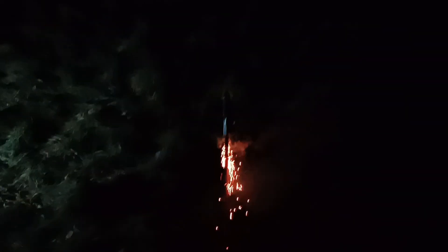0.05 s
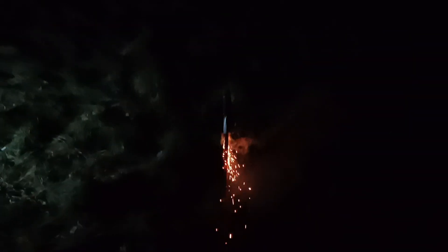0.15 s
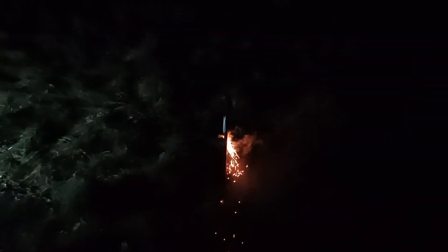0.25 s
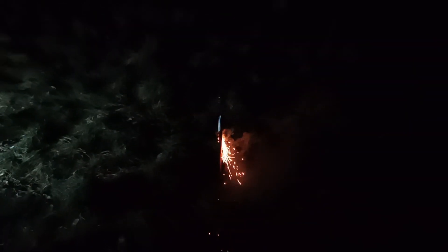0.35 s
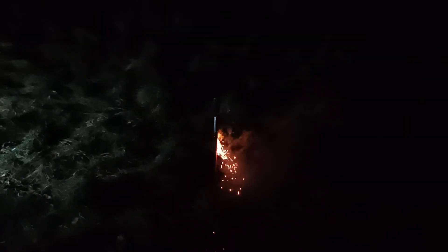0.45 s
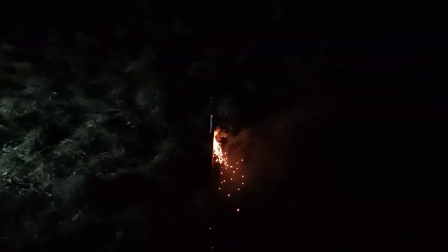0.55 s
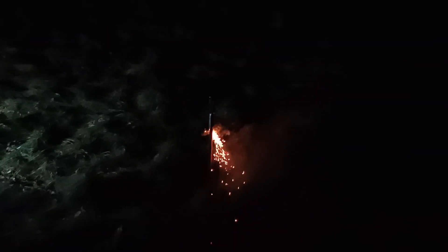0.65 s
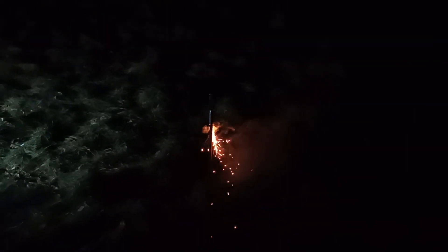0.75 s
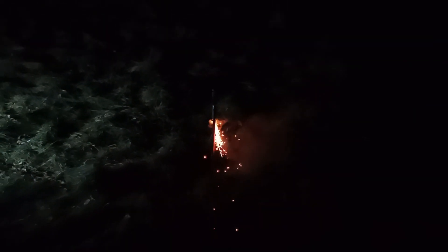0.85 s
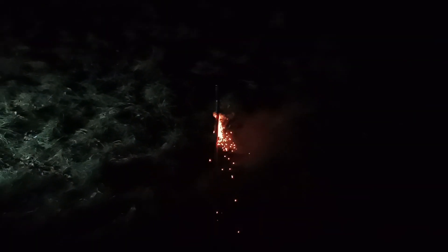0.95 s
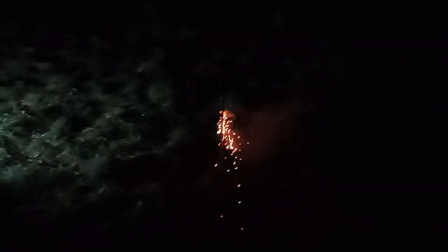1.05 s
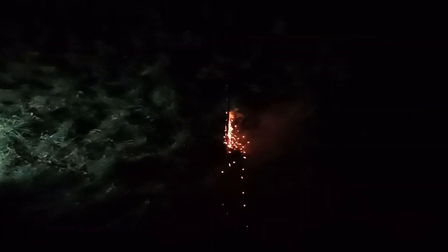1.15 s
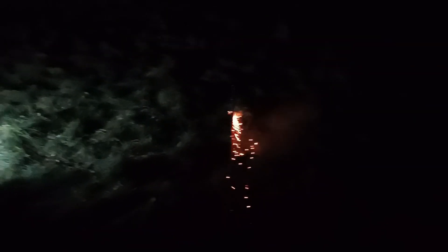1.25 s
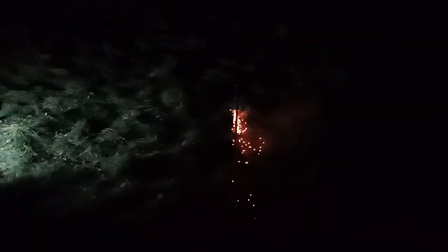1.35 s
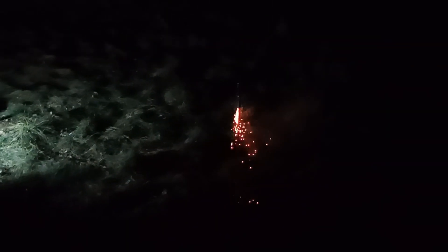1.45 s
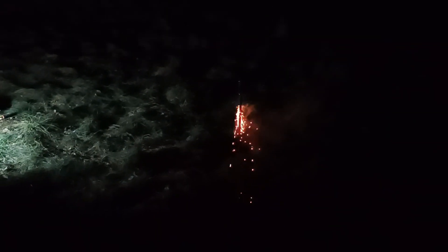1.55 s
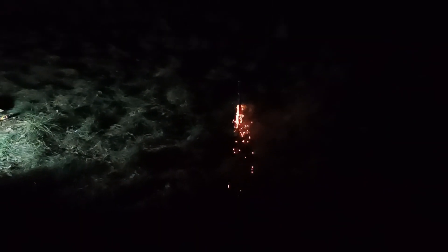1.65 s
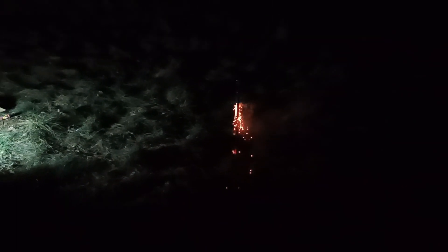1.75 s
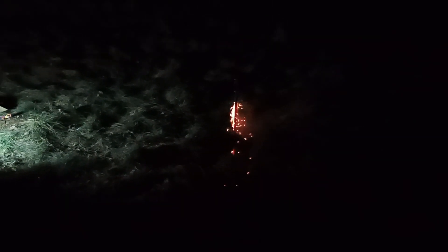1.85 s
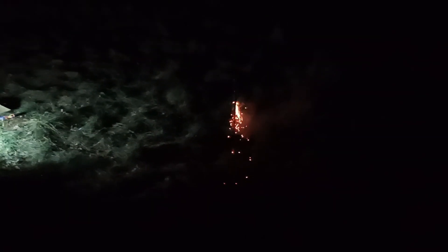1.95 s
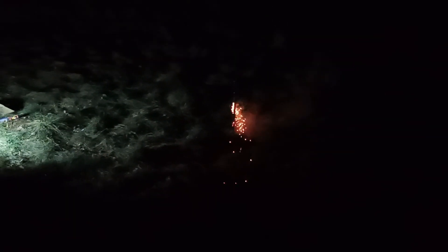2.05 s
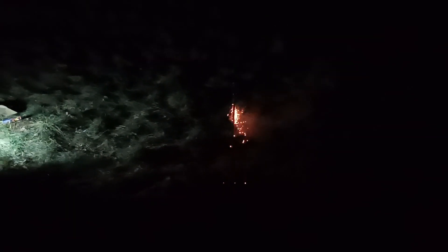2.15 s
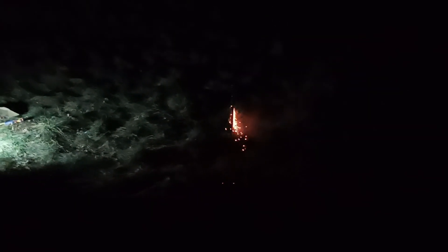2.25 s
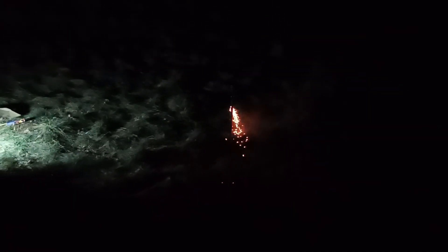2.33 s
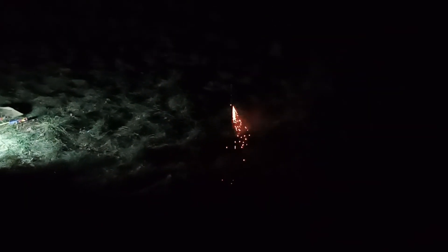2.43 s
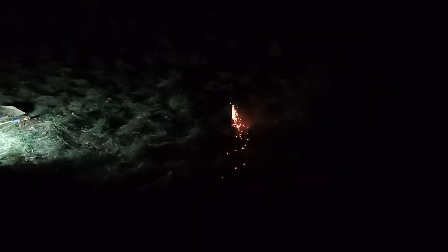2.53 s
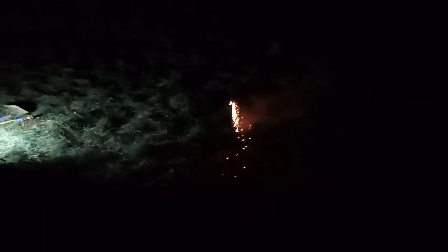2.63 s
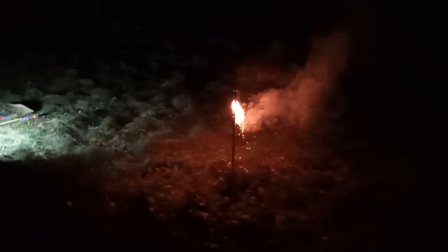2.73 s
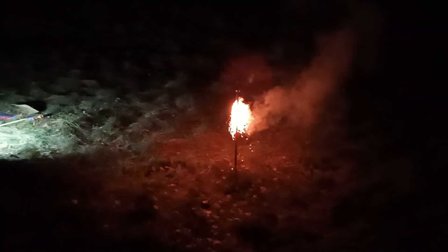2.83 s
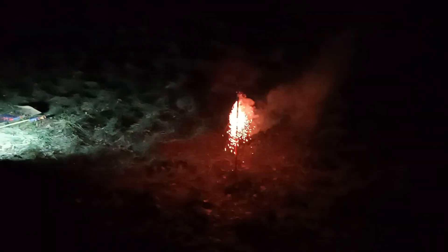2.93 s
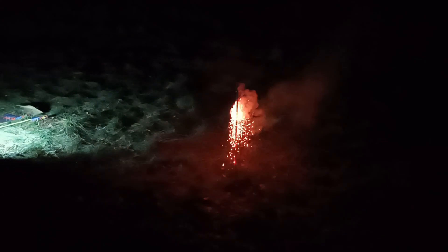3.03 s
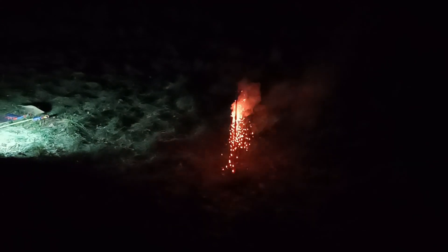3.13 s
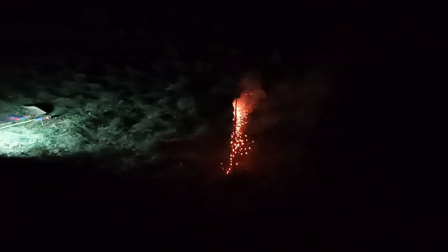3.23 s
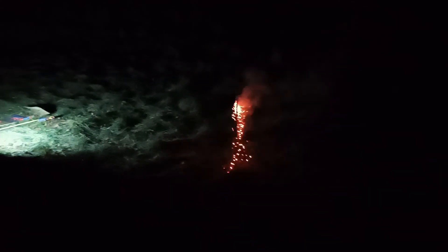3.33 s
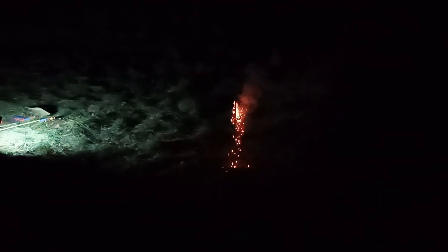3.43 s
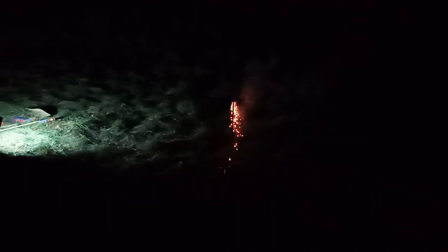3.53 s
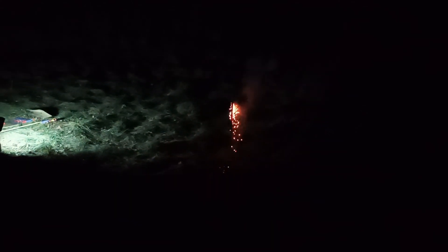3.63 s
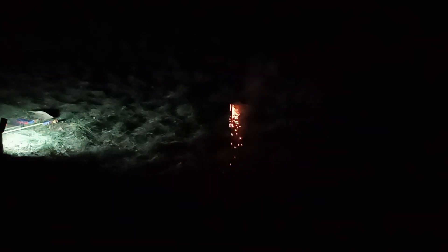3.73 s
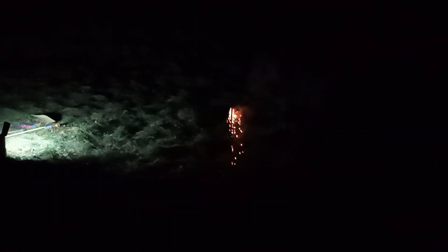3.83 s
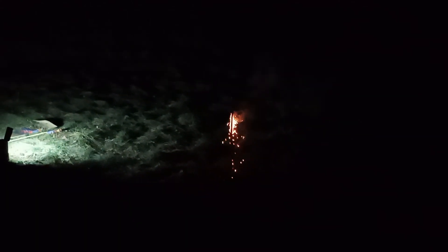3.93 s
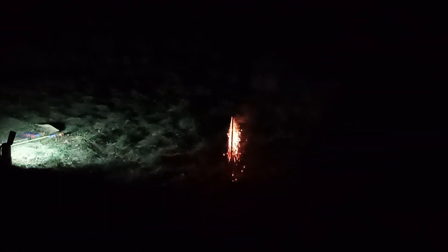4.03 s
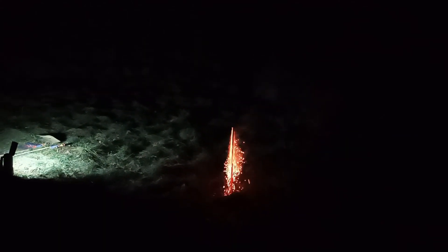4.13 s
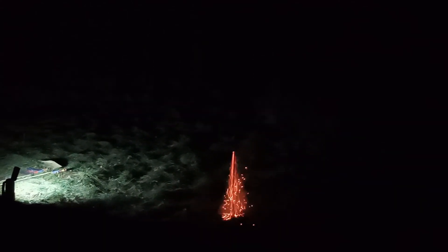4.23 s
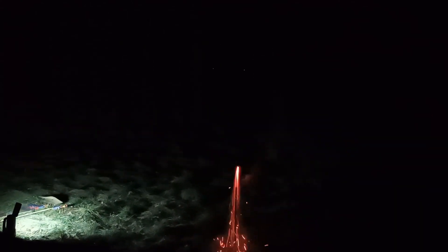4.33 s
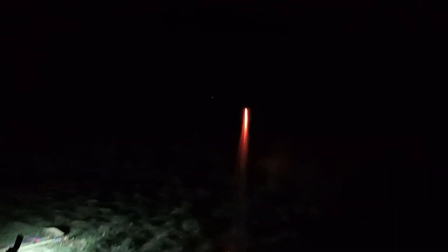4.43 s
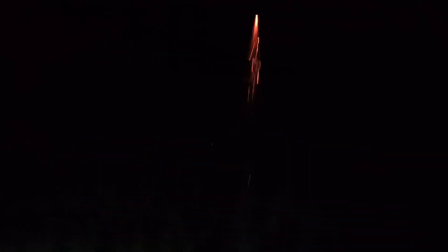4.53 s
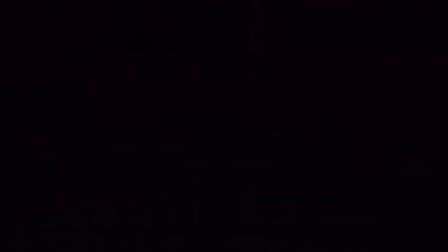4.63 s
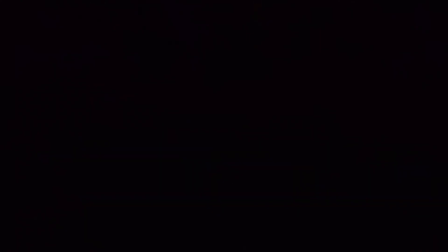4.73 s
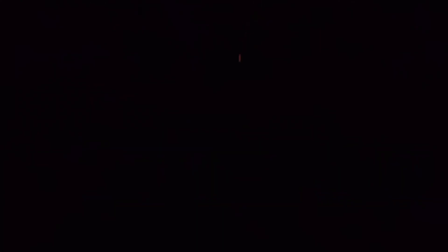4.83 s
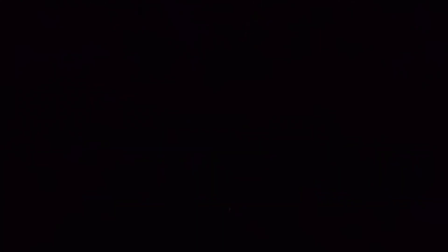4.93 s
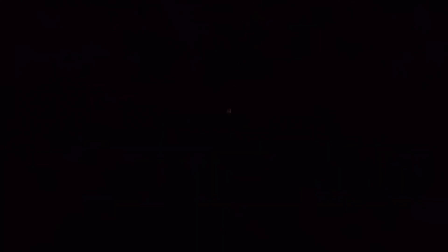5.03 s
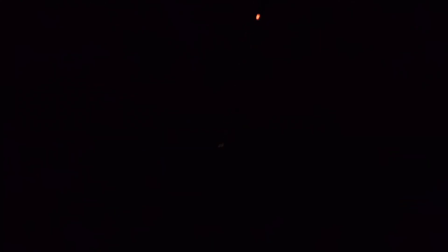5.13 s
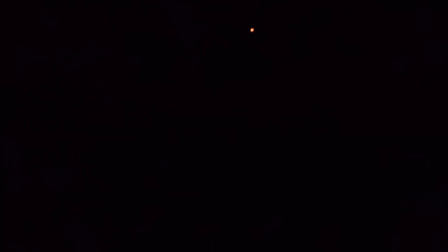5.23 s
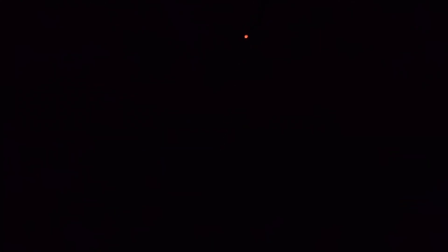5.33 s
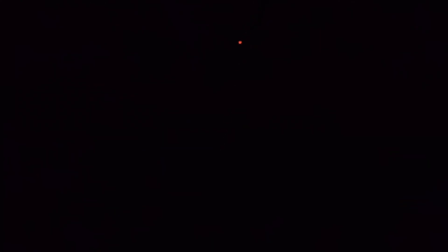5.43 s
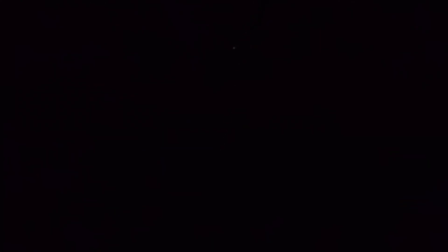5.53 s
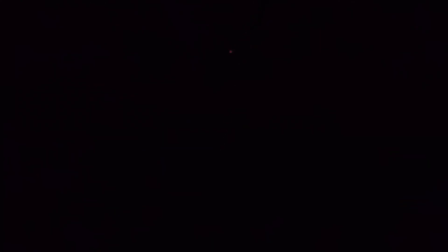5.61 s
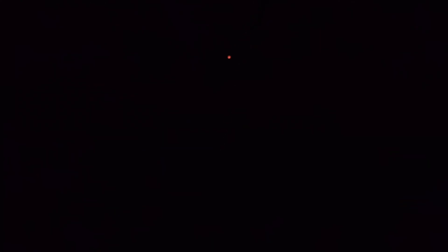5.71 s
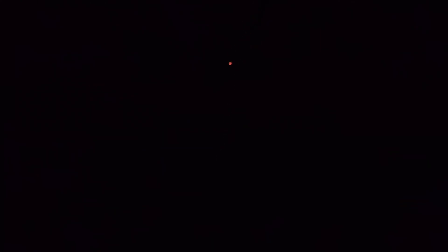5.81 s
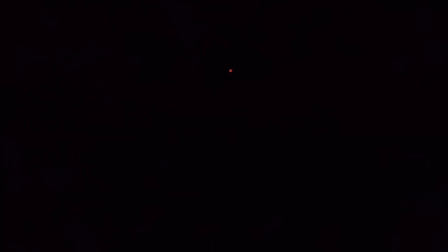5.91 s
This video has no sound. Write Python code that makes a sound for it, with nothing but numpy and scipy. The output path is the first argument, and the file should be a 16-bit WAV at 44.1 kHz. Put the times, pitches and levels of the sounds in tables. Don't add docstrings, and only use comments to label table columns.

```python
import sys
import numpy as np
from scipy import signal
from scipy.fft import rfft, irfft, next_fast_len
from scipy.io import wavfile
from scipy.ndimage import map_coordinates

SR = 44100
rng = np.random.default_rng(int(sys.argv[2]) if len(sys.argv) > 2 else 0)


def volts(x):
    e = np.asarray(x, float) / 20
    return 10 ** e


def pcm_store(signal):
    levels = np.round(np.clip(np.atleast_2d(signal), -1, 1) * 32767)
    wavfile.write(sys.argv[1], SR, levels.astype(np.int16).T)


N = 263277


def in_time(rows, t):
    s, *columns = np.transpose(rows)
    return [np.interp(t, s, c) for c in columns]


def at_hz(points, hz):
    point_hz, value = np.transpose(points)
    return np.interp(np.log(hz), np.log(point_hz), value)


def drift(rate_hz, size):
    knots = rng.standard_normal(int(size / SR * 60) + 62)
    r = np.exp(-2 * np.pi * rate_hz / 60)
    slow = signal.lfilter([np.sqrt(1 - r * r)], [1, -r], knots)[60:]
    return np.interp(np.linspace(0, len(slow) - 1, size), np.arange(len(slow)), slow)


def delayed(x, ms):
    return map_coordinates(x, [np.arange(len(x)) - ms / 1000 * SR], order=3)


def bursts(events, t, floor_db, rise_db_per_s, fall_db_per_s):
    s, hold_s, db = np.transpose(events)[:, :, None]
    rising = rise_db_per_s * np.maximum(s - t, 0)
    falling = fall_db_per_s * np.maximum(t - s - hold_s, 0)
    return np.maximum((db - rising - falling).max(0), floor_db)


def by_effort(rows, full_db, tilt_db, focus_db, tilt_per_db=0, focus_per_db=0, tilt_per_s=0, focus_per_s=0):
    s, db = np.transpose(rows)
    short_db, age_s = np.maximum(full_db - db, 0), s - s[0]
    tilt = tilt_db + tilt_per_db * short_db + tilt_per_s * age_s
    focus = focus_db + focus_per_db * short_db + focus_per_s * age_s
    return np.c_[s, db, tilt, focus]


# frequency in Hz, left-right likeness 0-1.
LIKENESS = [(100, 1), (250, 0.89), (700, 0.86), (1500, 0.68), (3000, 0.58), (5500, 0.51), (11000, 0.26)]
# frequency in Hz, lead of the left port in radians.
LEFT_LEAD = [(100, .01), (750, 0.29), (1500, 0.66), (3000, 0.4), (5500, 0.88), (11000, 1.1)]
# frequency in Hz, left over right in dB.
LEFT_GAIN = [(60, 1), (150, 1.5), (380, 0.5), (950, 0.0), (2380, 1.5), (5980, 1), (15000, -5.5)]


def hiss(rows, colour, centre_hz, patchy_db, crackle_db, direct, pan_db, step_oct=0.506, skirt=0):
    first, last = round(rows[0][0] * SR), min(round(rows[-1][0] * SR), N)
    size = next_fast_len(last - first)
    level_db, tilt_db, focus_db = in_time(rows, (first + np.arange(size)) / SR)
    white = rng.standard_normal((2, size)) * volts(crackle_db * rng.standard_normal((2, size)))
    hz = np.maximum(np.fft.rfftfreq(size, 1 / SR), 1)
    same, other = rfft(white) * volts(at_hz(colour, hz))

    alike = np.clip(direct * at_hz(LIKENESS, hz), 0, 1)
    lean = volts(.5 * (at_hz(LEFT_GAIN, hz) * direct + pan_db))
    shared = alike * same * np.exp(-1j * at_hz(LEFT_LEAD, hz))
    right = (shared + np.sqrt(1 - alike ** 2) * other) / lean
    lowest_hz = colour[0][0]
    pair = np.array([same * lean, right]) * (hz > lowest_hz)
    pair /= np.sqrt(np.mean(irfft(pair.mean(0), size) ** 2))

    out, together = np.zeros((2, N)), drift(9.0, size)
    for band_hz in lowest_hz * 2 ** np.arange(0, np.log2(17000 / lowest_hz) + step_oct, step_oct):
        off_band = np.log2(hz / band_hz) / step_oct / 2
        share = np.cos(np.pi * np.clip(off_band, -.5, .5)) ** 2
        octave = np.log2(band_hz / centre_hz)
        gain_db = level_db + tilt_db * octave - focus_db * octave ** 2
        gain_db = gain_db + patchy_db * (together + drift(35.0, size))
        aside = np.clip(octave - tilt_db / 2 / np.maximum(focus_db, 1), -1, 1)
        gain_db = gain_db - skirt * np.maximum(focus_db, 0) * aside ** 4
        out[:, first:last] += (irfft(pair * share, size) * volts(gain_db))[:, :last - first]
    return out


# time in seconds, distance in m that sets the delay, share the grass reflects 0-1.
LISTENER = [(0, 4.8, .4), (.45, 4.98, .4), (1.0, 5.07, .45), (1.1, 2.86, .8), (1.43, 2.94, .7),
            (1.7, 3.02, .4), (2.03, 3.17, .35), (2.28, 3.24, .7), (2.48, 3.31, .85), (2.68, 3.44, .45),
            (3.02, 3.62, .4), (3.14, 3.66, .8), (3.3, 3.68, .98), (3.55, 3.78, .95), (3.62, 3.75, .8),
            (3.88, 3.84, .9), (4.18, 3.95, .75)]


def ground(x):
    fire_height_m, ear_height_m, out_of_mirror_m, sound_m_per_ms = .6, 1.4, 3.4, .343
    ignition_s, plume_scatter_per_s, plume_clear_below_hz = 4.06, 5.5, 1700
    lift_off_s, climb_m_per_s2 = 4.3, 22
    second_bounce = .36
    t = np.arange(x.shape[1]) / SR
    distance_m, grass = in_time(LISTENER, t)
    height_m = fire_height_m + .5 * climb_m_per_s2 * np.maximum(t - lift_off_s, 0) ** 2
    height_m = np.minimum(height_m, out_of_mirror_m)
    clear = grass * np.clip((lift_off_s + 0.077 - t) / .05, 0, 1)
    share = grass / (1 + plume_scatter_per_s * np.maximum(t - ignition_s, 0))
    path_ms = 2 * height_m * ear_height_m / distance_m / sound_m_per_ms
    path_ms = path_ms + .008 * drift(5.0, N)[:len(t)]
    dull = signal.sosfiltfilt(signal.butter(1, 16000, fs=SR, output="sos"), x)
    once = np.array([delayed(side, path_ms) for side in dull])
    twice = np.array([delayed(side, 2 * path_ms) for side in dull])
    lows = signal.sosfiltfilt(signal.butter(2, plume_clear_below_hz, fs=SR, output="sos"), once)
    mirrored = share * (once + second_bounce * twice) + np.maximum(clear - share, 0) * lows
    return (x + mirrored) / np.sqrt(1 + share ** 2)


# time in seconds, delay in ms, share.
TILT = [(4.66, 0.26, 0.12), (5.1, .18, 0.21), (5.33, 0.18, .3), (5.5, 0.21, 0.15), (5.72, 0.12, 0.21),
        (5.97, 0.16, 0.17)]


def palm(x):
    first = round(TILT[0][0] * SR)
    ms, share = in_time(TILT, np.arange(first, N) / SR)
    dull = signal.sosfiltfilt(signal.butter(2, 8000, fs=SR, output="sos"), x[:, first:])
    return x + np.pad([share * delayed(side, ms) for side in dull], [(0, 0), (first, 0)])


# time in seconds, added lead of the left port in microseconds.
TURN = [(0, -10), (1.5, -1), (2.3, 18), (3.3, -11), (3.8, -26), (4.2, -31), (4.38, -20), (4.6, 7),
        (5.0, -5), (5.6, 6), (5.97, 20)]


def turned(air):
    lead_us, = in_time(TURN, np.arange(N) / SR)
    return np.array([air[0], delayed(air[1], lead_us / 1000)])


# delay in ms, share at left port, share at right port.
CASE_ECHOES = [(.36, -0.019, 0.056), (.57, 0.034, 0.039), (.68, -0.059, -0.018), (.82, 0.0066, 0.063)]
# frequency in Hz, width in Hz, gain in dB.
PORT_MODES = [(1390, 180, 1), (2540, 88, 1.5), (3340, 260, -1.5), (4630, 250, 0), (4030, 700, 1),
              (5180, 1000, -1.5), (5930, 170, 1), (6350, 280, -0.5), (7320, 270, 2.5), (9170, 1500, 2)]


def ports(air):
    step_hz, step_db = 7850, -6.5
    hz = np.fft.rfftfreq(N, 1 / SR)
    echoes = 1
    for ms, left, right in CASE_ECHOES:
        echoes = echoes + np.array([[left], [right]]) * np.exp(-2j * np.pi * hz * ms / 1000)
    gain_db = step_db / (1 + np.exp((step_hz - hz) / 150))
    for mode_hz, width_hz, db in PORT_MODES:
        gain_db = gain_db + db / (1 + (2 * (hz - mode_hz) / width_hz) ** 2)
    return irfft(rfft(air) * echoes * volts(gain_db), N)


def self_noise():
    return volts(-71.5) * rng.standard_normal((2, N))


# time in seconds, level in dB.
NIGHT = [(0, -50), (.5, -51), (.75, -52.5), (1.15, -51), (1.6, -54.5), (2.05, -50), (2.55, -53.5),
         (2.72, -55), (2.85, -52), (3.0, -54.5), (3.3, -52.5), (3.9, -57.5), (4.2, -49), (4.75, -55),
         (5.1, -62), (5.97, -55)]
# frequency in Hz, level in dB per Hz.
NIGHT_COLOUR = [(88, -15), (150, -2), (350, -7), (570, -5), (1400, -8), (2800, -14), (5500, -22.5),
                (8500, -24.5), (16000, -49)]


def night():
    calm = by_effort(NIGHT, full_db=-48.5, tilt_db=0.5, focus_db=-0.36, tilt_per_db=-0.06, focus_per_db=0.07)
    return hiss(calm, NIGHT_COLOUR, centre_hz=1470, patchy_db=1.2, crackle_db=1.0, direct=0.99, pan_db=-.5)


# time in seconds, level in dB, left over right in dB.
WIND = [(0, -45.5, 3), (.32, -54, 6), (.5, -43, -18), (.73, -46, 4), (1.3, -48.5, 10), (1.6, -54.5, 5),
        (2.1, -52.5, 6), (2.4, -55, 5.5), (3.3, -52.5, -1.5), (4.35, -59.5, 0), (4.48, -42, 17),
        (4.58, -40, 8), (4.69, -68, 4), (4.95, -58.5, -4), (5.4, -55, 3), (5.97, -57, -5)]
# centre in seconds, peak in dB, frequency in Hz.
BUFFETS_LEFT = [(0.015, -30, 54.6), (0.248, -37, 37.6), (0.493, -26.5, 82.5), (0.546, -30, 65.6),
                (0.676, -16, 67.6), (0.728, -14.5, 60), (0.81, -20.5, 69.7), (0.892, -31, 52),
                (0.96, -20, 66), (1.032, -20.5, 47.7), (1.077, -25, 33.5), (1.14, -30.5, 48.7),
                (1.201, -20.5, 53), (1.28, -27.5, 37), (1.386, -23, 48.4), (1.464, -31.5, 40),
                (1.665, -44, 52), (1.802, -39, 48), (1.896, -28.5, 38.2), (1.983, -30.5, 76.4),
                (2.056, -25, 44), (2.522, -43, 53), (2.81, -47, 65), (3.278, -34.5, 51.4),
                (4.432, -41, 81.5), (4.476, -24, 63.3), (4.549, -23.5, 121), (4.607, -35, 76),
                (4.585, -22, 152), (4.632, -24.5, 172), (.655, -20, 45.7), (.76, -23.5, 58.5),
                (.925, -34, 60), (1.01, -24.5, 75.6), (1.33, -31, 50), (2.86, -43, 40), (2.96, -41, 43.2),
                (3.5, -52, 55), (5.08, -48, 45), (5.45, -44, 50)]
# centre in seconds, peak in dB, frequency in Hz.
BUFFETS_RIGHT = [(0.034, -25.5, 44.6), (0.1, -35.5, 42), (0.176, -36, 45.7), (0.26, -30.5, 54),
                 (0.471, -17, 49), (0.509, -21, 72.6), (0.551, -10.5, 46.2), (0.654, -17.5, 46.3),
                 (0.741, -24, 99), (0.865, -37, 43), (0.918, -29, 39.8), (0.963, -44, 72), (1.074, -35, 49),
                 (4.487, -29, 139), (4.55, -37, 87), (4.597, -21.5, 57.5), (4.519, -26.5, 171),
                 (4.574, -30, 130), (4.62, -20.5, 185), (.445, -22, 85.4), (.625, -26.5, 59.7),
                 (.785, -32, 45), (4.96, -37, 42), (5.01, -40, 40)]
CREST_SHARE = [.3, 0.25]


def wind():
    level_db, pan_db = in_time(WIND, np.arange(N) / SR)
    band = signal.butter(2, [11, 62], "band", fs=SR, output="sos")
    out = signal.sosfilt(band, rng.standard_normal((2, N + SR)))[:, SR:]
    out *= volts(level_db + 4.0 + .5 * pan_db * np.array([[1], [-1]])) / out.std()
    out *= volts(2.1 * np.array([drift(4.5, N), drift(3.0, N)]))
    near = np.arange(-4000, 4000)
    t = near / SR
    for side, buffets in enumerate((BUFFETS_LEFT, BUFFETS_RIGHT)):
        for (s, peak_db, hz), turn in zip(buffets, rng.random(len(buffets))):
            cycle = 2 * np.pi * (hz * t + turn)
            flap = np.sin(cycle) * np.exp(-(t * hz / 0.83) ** 2)
            flap += CREST_SHARE[side] * np.sin(2.18 * cycle) * np.exp(-(t * hz / 0.45) ** 2)
            at = round(s * SR) + near
            out[side, at[at >= 0]] += volts(peak_db) * flap[at >= 0]
    return out


# time in seconds, level in dB.
BLAST = [(4.44, -57), (4.475, -40), (4.53, -40.5), (4.6, -40), (4.635, -42), (4.65, -61)]
# frequency in Hz, level in dB per Hz.
BLAST_COLOUR = [(120, -4), (200, 1), (330, -6), (500, -6), (800, -25)]


def backwash():
    gust = by_effort(BLAST, full_db=-40, tilt_db=-0.5, focus_db=-0.5)
    return hiss(gust, BLAST_COLOUR, centre_hz=250, patchy_db=2.0, crackle_db=0.5, direct=0.1, pan_db=1.0)


# start in seconds, peak in dB, frequency in Hz, t60 in seconds, brightness in dB.
KNOCKS = [(0.364, -37, 764, 0.018, -10), (0.411, -30.5, 194, 0.052, -27), (1.596, -30, 278, 0.021, -33),
          (1.599, -33.5, 80, 0.041, -30), (1.75, -37.5, 235, 0.033, -9), (2.273, -27, 180, 0.095, -32),
          (2.315, -40, 400, 0.01, -2.5), (2.5614, -35.5, 298, 0.049, -6.5), (2.569, -33.5, 85, 0.14, -30),
          (2.6188, -30.5, 267, 0.031, -26), (2.622, -30, 85, 0.067, -30), (2.638, -33.5, 125, 0.067, -30),
          (2.652, -36, 70, 0.079, -27), (2.81, -39, 171, 0.052, -11), (2.851, -37.5, 105, 0.059, -25),
          (3.68, -39.5, 598, 0.085, -4.5), (3.699, -35.5, 324, 0.015, -13), (5.725, -24.5, 310, 0.023, -10),
          (5.7349, -23, 310, 0.016, -15.5), (3.689, -41, 202, 0.083, -26), (4.0, -41.5, 250, 0.032, -10)]


def knocks():
    out, t = np.zeros(N + 8000), np.arange(8000) / SR
    dull = signal.butter(2, [250, 1300], "band", fs=SR, output="sos")
    for s, peak_db, hz, t60_s, bright_db in KNOCKS:
        ring = -np.sin(2 * np.pi * hz * 0.0597 * np.log1p(t / 0.0608))
        mode = ring * volts(-60 * t / t60_s) * (1 - np.exp(-t / 0.00075))
        grit = rng.standard_normal(8000) * volts(-60 * t / 0.028)
        scuff = 5 * volts(bright_db) * signal.sosfilt(dull, grit)
        first = round(s * SR)
        out[first:first + 8000] += volts(peak_db) * (mode + scuff)
    return out[:N]


# start in seconds, length in seconds, from Hz, to Hz, level in dB.
SQUEAKS = [
    (1.848, .035, 14450, 14800, -55),
    (1.897, .018, 15100, 15550, -69),
]


def squeaks():
    t, out = np.arange(N) / SR, np.zeros(N)
    for s, length_s, from_hz, to_hz, db in SQUEAKS:
        done = np.clip((t - s) / length_s, 0, 1)
        cycles = np.cumsum(from_hz + (to_hz - from_hz) * done) / SR
        out += volts(db) * np.sin(np.pi * done) * np.sin(2 * np.pi * cycles)
    return out


# start in seconds, hold in seconds, level in dB.
RUSTLES = [(.55, .01, -65.5), (.62, 0.11, -67.5), (.85, 0.53, -66), (1.51, .01, -66.5),
           (1.65, 0.099, -71.5), (1.86, 0.15, -69), (2.05, 0.11, -64), (2.32, .01, -70),
           (2.44, 0.0092, -68), (2.5, .1, -70.5), (3.03, .01, -72), (3.16, .03, -65), (3.31, .01, -68),
           (3.46, .02, -66), (3.62, 0.34, -68.5), (4.05, .01, -82)]
# frequency in Hz, level in dB per Hz.
RUSTLE_COLOUR = [(3000, -9), (6000, -0.5), (9000, 1), (16000, -7)]


def rustle():
    t = np.linspace(.5, 4.05, 711)
    moves = np.c_[t, bursts(RUSTLES, t, floor_db=-93, rise_db_per_s=178, fall_db_per_s=248)]
    cloth = by_effort(moves, full_db=-66, tilt_db=-1.5, focus_db=-2.2, tilt_per_db=0.2, focus_per_db=0.25)
    return volts(6.0) * hiss(cloth, RUSTLE_COLOUR, centre_hz=9570, patchy_db=1.5, crackle_db=5.5,
                           direct=0.52, pan_db=5.0)


# time in seconds, level in dB.
SPARKS = [(0, -41.5), (.1, -42.5), (.23, -44), (.29, -55), (.4, -50.5), (.53, -49), (.6, -67), (.8, -94)]
# frequency in Hz, level in dB per Hz.
SPARKS_COLOUR = [(300, 0), (600, -1), (1050, 0), (2500, -3.5), (3300, -5.5), (5900, 0.5), (8500, -2.5),
                 (16000, -6)]


def sparks():
    spurt = by_effort(SPARKS, full_db=-40, tilt_db=-1.5, focus_db=1.0, tilt_per_db=-0.0841, focus_per_db=-0.1)
    return hiss(spurt, SPARKS_COLOUR, centre_hz=3000, patchy_db=1.8, crackle_db=0.0, direct=0.87, pan_db=0.5)


# time in seconds, level in dB.
TUBE = [(0, -48), (.055, -49.5), (.09, -58), (.18, -50), (.245, -43.5), (.3, -52), (.37, -59), (.6, -67)]
# frequency in Hz, level in dB per Hz.
TUBE_COLOUR = [(1000, -25), (1210, -12), (1290, 0), (1380, -11), (1620, -25), (1840, -15), (1920, -3),
               (2010, -15), (2280, -10), (2450, -17), (2900, -14), (3300, -30)]
# start in seconds, hold in seconds, gain in dB.
PUFFS = [
    (.052, .005, 8.5),
    (.108, .006, 10),
    (.183, .005, 3.5),
    (.218, .008, 3),
    (.245, 0.0072, 1),
]


def tube():
    t = np.linspace(0, .6, 301)
    puffs_db = bursts(PUFFS, t, floor_db=0, rise_db_per_s=1500, fall_db_per_s=700)
    puffing = np.c_[t, in_time(TUBE, t)[0] + puffs_db]
    song = by_effort(puffing, full_db=-47, tilt_db=-6.0, focus_db=6.0, tilt_per_db=-0.2, tilt_per_s=13.0)
    return hiss(song, TUBE_COLOUR, centre_hz=1545, patchy_db=1.0, crackle_db=-2.0, direct=1.0, pan_db=-5.5)


# start in seconds, hold in seconds, level in dB.
FLARES = [(0, .26, -48), (.32, .22, -54), (1.07, .03, -55), (1.13, .02, -50), (1.24, .2, -56.5),
          (1.5, .2, -53.5), (1.82, .08, -49), (1.92, .1, -43), (2.12, .28, -46.5), (2.44, .12, -39),
          (2.6, .04, -49), (2.79, 0.1, -56), (2.93, .05, -55), (3.035, .06, -48.5), (3.12, 0.075, -43.5),
          (3.24, 0.11, -45.5), (3.37, 0.095, -45), (3.52, 0.024, -46), (3.65, .03, -52), (3.72, 0.03, -47),
          (3.86, 0.08, -52), (4.03, .02, -55)]
# time in seconds, pitch in Hz, focus in dB per octave squared.
FUSE_JET = [(.2, 11900, 0), (.55, 7250, 10), (1.0, 4800, 20), (1.12, 3880, 50), (1.3, 4100, 26),
            (1.6, 3970, 24.5), (1.95, 4450, 33), (2.52, 4370, 38), (2.72, 6350, 31.5), (2.96, 5700, 46),
            (3.05, 5250, 55), (3.2, 5070, 55), (3.5, 5350, 56), (3.92, 5450, 39), (4.05, 4540, 21.5)]
# frequency in Hz, level in dB per Hz.
FUSE_COLOUR = [(1500, -16), (3200, -8), (3900, -1), (5000, 2), (6300, -2), (8000, -5.5), (16000, -10)]


def fuse():
    centre_hz = 4800
    t = np.linspace(0, 4.05, 811)
    jet_hz, focus = in_time(FUSE_JET, t)
    octave = np.log2(jet_hz / centre_hz)
    db = bursts(FLARES, t, floor_db=-65, rise_db_per_s=136, fall_db_per_s=117)
    burn = np.c_[t, db - focus * octave ** 2, 2 * focus * octave, focus]
    return hiss(burn, FUSE_COLOUR, centre_hz, patchy_db=1.5, crackle_db=5.5, direct=1.0, pan_db=3.0,
                step_oct=1 / 5, skirt=1.3)


# time in seconds, level in dB.
IGNITION = [(3.99, -60.5), (4.03, -50), (4.055, -43.5), (4.09, -38), (4.13, -33), (4.19, -33.5),
            (4.25, -35), (4.32, -40), (4.36, -58)]
# frequency in Hz, level in dB per Hz.
IGNITION_COLOUR = [(1500, -25), (2500, -5), (3800, 3), (5200, 5), (7000, -11), (9000, -16), (16000, -13)]


def ignition():
    kindling = by_effort(IGNITION, full_db=-31.0, tilt_db=0.5, focus_db=3.0, focus_per_db=1.0,
                         tilt_per_s=11.0, focus_per_s=-5.0)
    return hiss(kindling, IGNITION_COLOUR, centre_hz=4700, patchy_db=0.5, crackle_db=-2.0,
                direct=1.0, pan_db=1.5)


# time in seconds, peak in dB,
# sign of the first half.
POPS = [(0.3658, -30.5, -1), (2.5618, -38, 1), (2.619, -44, 1), (3.6807, -48, 1), (4.965, -27, 1),
        (4.9818, -26, 1), (5.146, -22, -1), (5.226, -25, 1), (5.2565, -32, 1), (5.339, -41, 1),
        (5.449, -24, 1), (5.4705, -29, -1), (5.5688, -27, 1), (5.747, -22, 1), (5.7893, -24, 1),
        (5.834, -38, 1)]


def pops():
    t, out = np.arange(N) / SR, np.zeros(N)
    for s, peak_db, sign in POPS:
        out += volts(peak_db) * (np.abs(t - s) < .0005) * np.sign(sign) * (s - t) / 0.00057
    return signal.sosfilt(signal.butter(2, 2500, fs=SR, output="sos"), out)


# time in seconds, level in dB.
ALOFT = [(4.66, -31), (4.78, -35.5), (4.9, -32), (4.99, -31.5), (5.08, -32.5), (5.2, -33), (5.35, -34),
         (5.5, -35), (5.76, -40), (5.97, -46.5)]
# frequency in Hz, level in dB per Hz.
ALOFT_COLOUR = [(88, -33), (150, -13.5), (330, -15), (550, -9), (890, -3.5), (1150, -2.5), (1420, -0.5),
                (1750, -5.5), (2150, -6), (2900, -12.5), (4200, -15), (5400, -11), (8500, -20.5),
                (16000, -28)]
# start in seconds, hold in seconds, gain in dB.
SURGES = [(4.96, 0.076, 1.5), (5.12, 0.035, 2.5), (5.225, 0.027, 2), (5.34, 0.069, 2), (5.45, 0.024, 1.5),
          (5.565, 0.014, 1.5), (5.685, 0.069, 2), (5.83, 0.013, 3)]


def aloft():
    t = np.linspace(4.66, 5.97, 263)
    surges_db = bursts(SURGES, t, floor_db=0, rise_db_per_s=130, fall_db_per_s=104)
    chugging = np.c_[t, in_time(ALOFT, t)[0] + surges_db]
    climb = by_effort(chugging, full_db=-30.0, tilt_db=2.0, focus_db=0.08, focus_per_db=-0.05,
                      tilt_per_db=0.04, tilt_per_s=-3.0, focus_per_s=0.66)
    return hiss(climb, ALOFT_COLOUR, centre_hz=1910, patchy_db=0.51, crackle_db=2.0, direct=0.92, pan_db=-1.5)


# time in seconds, peak in dB.
SHOCKS = [(4.279, -19), (4.3422, -18), (4.3657, -17), (4.367, -12.5), (4.3848, -17), (4.3862, -14),
          (4.4002, -18), (4.4258, -19), (4.5097, -17), (4.5217, -18), (4.5275, -17), (4.576, -18),
          (4.5923, -19), (4.6319, -18), (4.6671, -21), (4.6814, -22)]


def shocks():
    out, ms = np.zeros(N), np.arange(-60, 120) / SR * 1000
    spike = np.exp(-(ms / .16) ** 2) - .3 * np.exp(-((ms - .45) / 0.33) ** 2)
    for s, peak_db in SHOCKS:
        at = round(s * SR)
        out[at - 60:at + 120] += volts(peak_db) * spike
    return signal.sosfiltfilt(signal.butter(2, 450, "high", fs=SR, output="sos"), out)


# time in seconds, level in dB.
MOTOR = [(4.0, -61), (4.065, -37.5), (4.21, -29), (4.27, -21), (4.39, -22.5), (4.6, -22.5), (4.72, -29.5),
         (4.765, -43.5), (4.85, -52)]
# frequency in Hz, level in dB per Hz.
MOTOR_COLOUR = [(60, -54), (200, -4.5), (350, -13.5), (560, -3.5), (850, -3.5), (1150, -2), (1500, -3.5),
                (3300, -6), (5500, -2), (8700, -11), (14900, -16.5), (16000, -10.5)]


def motor():
    thrust = by_effort(MOTOR, full_db=-29.5, tilt_db=0.26, focus_db=0.3, tilt_per_db=0.3968,
                       focus_per_db=0.5, tilt_per_s=-0.32)
    return hiss(thrust, MOTOR_COLOUR, centre_hz=2070, patchy_db=0.7, crackle_db=1.5, direct=1.24, pan_db=1.0)


def scene():
    low = round(MOTOR[-1][0] * SR + 999)
    near_ground = fuse() + ignition() + motor() + sparks() + rustle()
    mirrored = np.pad(ground(near_ground[:, :low]), [(0, 0), (0, N - low)])
    air = mirrored + tube() + palm(aloft()) + pops() + shocks() + night() + squeaks()
    return ports(turned(air)) + backwash() + wind() + knocks() + self_noise()


def roll_off(x):
    return signal.sosfilt(signal.butter(12, 16260, fs=SR, output="sos"), x)


def record(dry):
    cutoff_hz = 15770
    rounded = rfft(0.44 * np.tanh(dry / 0.46))
    mix = irfft(rounded * (np.fft.rfftfreq(N, 1 / SR) < cutoff_hz), N)
    return roll_off(mix)


dry = scene()
out = record(dry)
pcm_store(out)
```